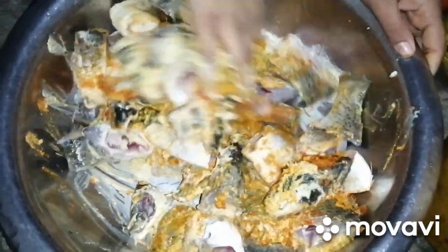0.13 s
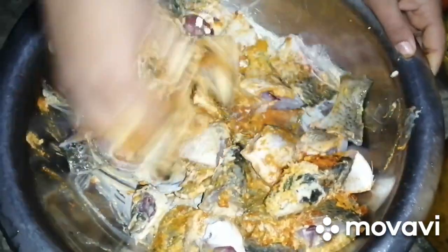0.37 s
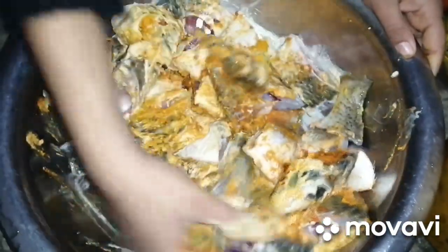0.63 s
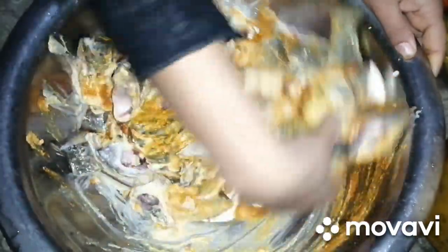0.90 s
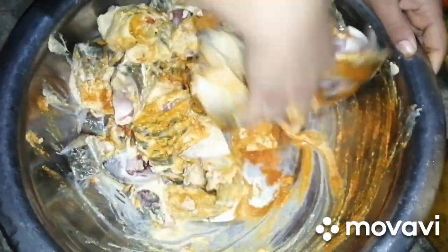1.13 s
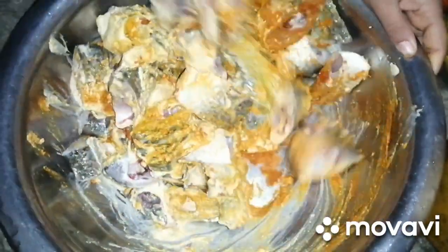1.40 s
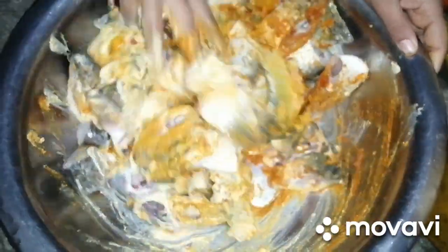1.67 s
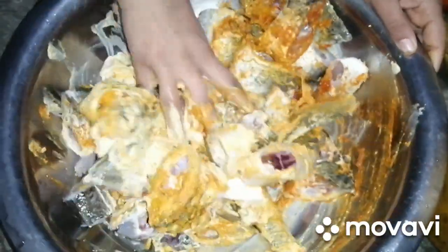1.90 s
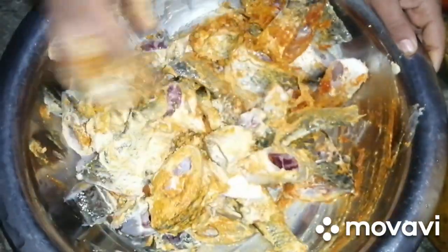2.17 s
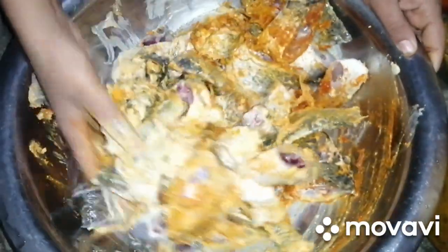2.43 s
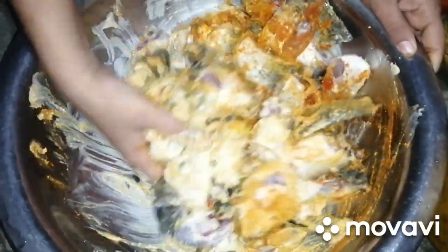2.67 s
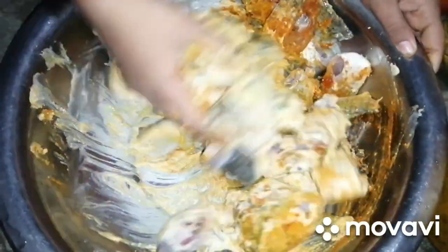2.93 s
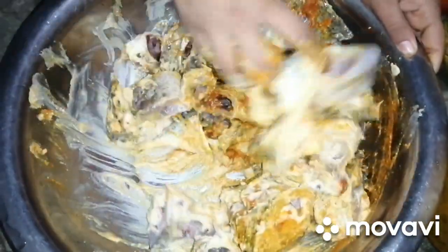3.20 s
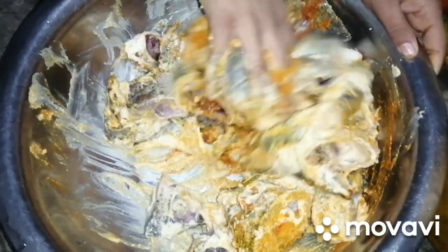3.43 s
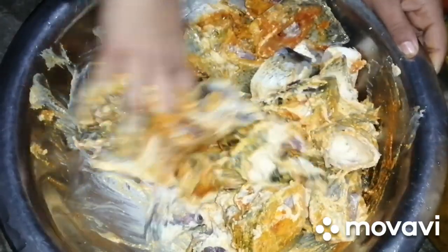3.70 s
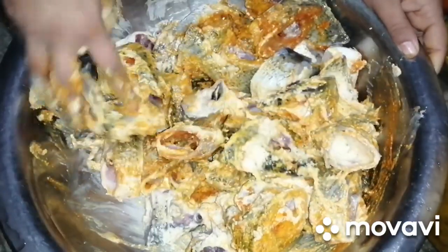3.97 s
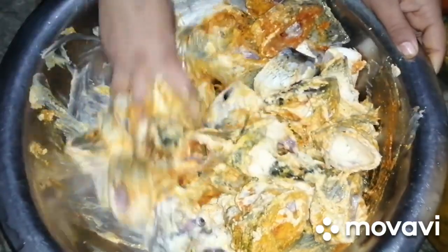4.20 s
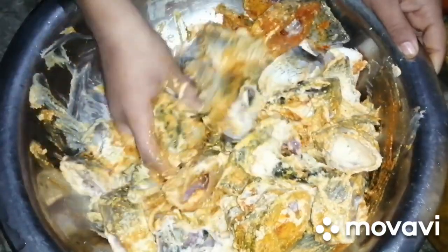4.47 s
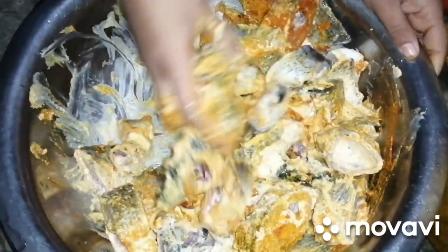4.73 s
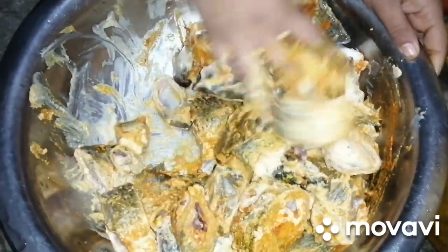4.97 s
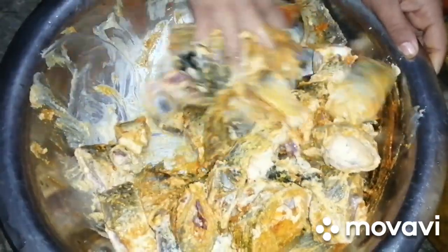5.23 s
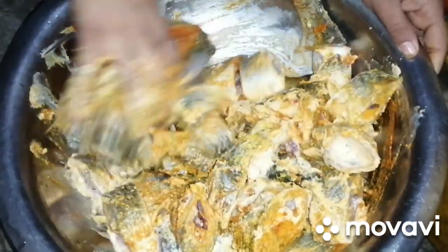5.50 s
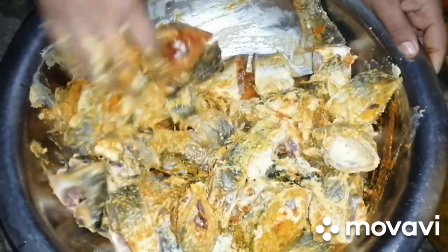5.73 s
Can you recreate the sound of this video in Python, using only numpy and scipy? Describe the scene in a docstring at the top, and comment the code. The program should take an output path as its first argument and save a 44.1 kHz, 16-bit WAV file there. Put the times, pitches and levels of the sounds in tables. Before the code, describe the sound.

Close slimy smacks and tearing paste in a wide metal bowl, occasional low bowl thumps, and a faint throbbing motor rising near the end.

```python
"""A hand turns pieces of raw fish through thick paste in a wide steel bowl in a bare kitchen.
From the start the paste hisses and crackles as noise that flares at random tears, and the bowl rocks and sloshes.
Faint tones soon glide, air pockets smack as short rings in rough cracks, and blows ring the bowl's modes,
hardest near the middle. The room answers with fading noise tails. A far motor, a pulsed low tone, grows
towards the end. Two microphone ports colour the treble very differently."""
import sys
import numpy as np
from scipy import signal
from scipy.fft import rfft, irfft, next_fast_len
from scipy.io import wavfile
from scipy.ndimage import uniform_filter1d, map_coordinates

SR = 44100
rng = np.random.default_rng(int(sys.argv[2]) if len(sys.argv) > 2 else 0)


def magnitude_from_level(level_db):
    """Linear magnitude for a level in decibels (20 dB per decade)."""
    exponent = np.asarray(level_db, float) / 20
    return 10 ** exponent


def generate_wav(signal):
    """Clip the signal to [-1, 1] and save it as 16-bit WAV at the path in sys.argv[1]."""
    frames = np.transpose(np.atleast_2d(signal))
    scaled = np.clip(frames, -1, 1) * 32767
    pcm = np.round(scaled).astype(np.int16)
    wavfile.write(sys.argv[1], SR, pcm)


N = 259043  # length in samples

# How alike long and short waves reach the two ports: f/Hz, left-right likeness (1 = the same)
LIKENESS = [(60, 0.81), (180, 0.95), (550, 0.48), (1650, 0), (4970, 0.0), (15000, 0.0)]
# Blows on the bowl: t/s, boom level/dB, body level/dB, knock level/dB, freedom to ring (0-1);
# the levels are relative, and thumps() trims each group
BLOWS = [(0.489, -55, -50.5, -44.5, 0.4), (0.809, -38.5, -55, -70, 0.36), (1.546, -41, -42, -31, 0.52),
         (1.751, -57, -44, -35, 1), (1.761, -28.5, -46, -23.5, 0.72), (1.806, -51, -58, -34, 0.67),
         (1.835, -44, -57, -36, 0.88), (2.117, -19.5, -49, -32, 0.53), (2.17, -30.5, -48, -39, 0.61),
         (2.29, -36.5, -55, -55, 0.6), (2.318, -41, -48, -37.5, 0.44), (2.831, -13, -19.5, -11.5, 0.51),
         (2.855, -21, -38, -28.5, 0.47), (3.352, -44.5, -49, -54.5, 1), (3.488, -68, -52, -54, 0.6),
         (4.8, -32.5, -56, -37.5, 0.5), (4.831, -47.5, -55, -41.5, 0.3), (5.19, -31.5, -20.5, -23, 0.81),
         (5.235, -42, -31.5, -61, 0.5), (5.733, -39, -44, -43, 0.28)]


def unit(x):
    """Scale to rms 1."""
    return x / np.sqrt(np.mean(x ** 2) + 1e-20)


def along(points, hz, order=1):
    """Read one column of a table on a log frequency axis."""
    table = np.transpose(points)
    return np.interp(np.log(hz + 1), np.log(table[0] + 1), table[order])


def curves(rows):
    """Give one value per sample for each column after the time."""
    s, *columns = np.transpose(rows)
    return [np.interp(np.arange(N) / SR, s, column) for column in columns]


def wobble(rate):
    """A smooth random curve through `rate` random points a second."""
    points = rng.standard_normal(int(N * 400 / SR) + 4)
    return map_coordinates(points, [np.arange(N) * rate / SR])


def filtered(x, response):
    """Multiply the spectrum of x by a response of frequency."""
    m = next_fast_len(N + SR // 2)
    return irfft(rfft(x, m) * response(np.fft.rfftfreq(m, 1 / SR)), m)[..., :N]


def hump(x, centre_hz, octaves):
    """Keep a bell-shaped band on a log axis, at rms 1."""
    return unit(filtered(x, lambda hz: np.exp(-(np.log2((hz + 1) / centre_hz) / octaves) ** 2)))


def rush(spectrum):
    """Stereo noise of rms 1: alike in the bass, where waves are long, and unrelated above."""
    def mid_side(hz):
        turn = np.arccos(np.clip(along(LIKENESS, hz), -1, 1)) / 2
        return magnitude_from_level(along(spectrum, hz)) * [np.cos(turn), np.sin(turn)]

    mid, side = filtered(rng.standard_normal((2, N)), mid_side)
    return unit(np.array([mid + side, mid - side]))


def patchy(x, depth_db):
    """Short narrow patches of random gain make the noise uneven in time and pitch."""
    z = signal.stft(x, nperseg=1024)[2]
    field = rng.standard_normal(z.shape[1:])
    for axis in (0, 1):
        field = uniform_filter1d(field, size=3, axis=axis)
    return signal.istft(z * magnitude_from_level(depth_db * unit(field)), nperseg=1024)[1][:, :N]


def room(x):
    """Each frequency of the kitchen's answer dies at its own speed; a new tail every third of a second."""
    # How long the room rings: f/Hz, time to fall 60 dB/s
    decay = [(100, 0.24), (600, 0.62), (1500, 0.44), (5000, 0.15), (12000, 0.033)]
    wet, hop = np.zeros((2, N + 2 * SR)), SR // 3
    for start in range(0, N, hop):
        hz, t, z = signal.stft(rng.standard_normal((2, SR * 3 // 4)), SR, nperseg=256)
        turn = np.arccos(np.clip(along(LIKENESS, hz), -1, 1))[:, None]
        z[1] = np.cos(turn) * z[0] + np.sin(turn) * z[1]  # long waves reach both ports alike
        fade = magnitude_from_level(-60 * t / along(decay, hz)[:, None])
        tail = signal.istft(z * fade, SR, nperseg=256)[1]
        echo = signal.fftconvolve(x[:, start:start + hop], tail / np.linalg.norm(tail[0]), axes=1)
        wet[:, start + 400:][:, :echo.shape[1]] += echo  # the answer comes 400 samples late
    return wet[:, :N]


def motor():
    """A far motor throbs through the floor: about 17 swells a second of a tone near 154 Hz."""
    # Slow rise and fall of the motor: t/s, level/dB
    swell = [(0, -65.5), (1, -64), (2, -88), (3, -61), (3.6, -71), (4.1, -68), (4.4, -55.5), (5, -52.5),
             (5.5, -50), (5.87, -51)]
    t = np.arange(N) / SR
    beat = (1 + np.cos(2 * np.pi * 17.1 * t + 1.2 * wobble(rate=2.5))) ** 1.2
    tone = np.sin(2 * np.pi * 154 * t + 0.58 * wobble(rate=5.2))
    level = magnitude_from_level(curves(swell)[0] + 0.4 * wobble(rate=15))
    return level * unit(beat * tone) * magnitude_from_level([[-1.4], [1.4]])  # leans right


def glides():
    """Soft wavering tones slide towards a resting pitch, quickly at first and then more slowly."""
    # Faint tones: start t/s, length/s, from f/Hz, to f/Hz, level/dB (rms, before the waver)
    slides = [(0.398, 0.48, 327, 312, -59.5), (0.777, 0.13, 1160, 1190, -66.5),
              (1.064, 0.198, 856, 955, -68.5)]
    out, t = np.zeros(N), np.arange(N) / SR
    for s, length, from_hz, to_hz, db in slides:
        progress = np.clip((t - s) / length, 0, 1)
        hz = to_hz + (from_hz - to_hz) * (1 - progress) ** 2 + 8 * wobble(rate=15)
        level = magnitude_from_level(db + 6.7 * wobble(rate=22)) * np.sin(np.pi * progress) ** 0.14
        out += level * np.sin(2 * np.pi * np.cumsum(hz) / SR)
    return out * np.sqrt(2)  # from rms to peak


def load():
    """The bowl rocks on its base and the pieces slosh against its wall, over a faint even hiss."""
    # Weight shifting in the bowl: t/s, rocking level/dB, sloshing level/dB
    shifting = [(0.0, -46, -50.5), (0.16, -57.5, -62.5), (0.45, -55, -64), (0.69, -59, -53.5),
                (1.1, -58, -60.5), (1.4, -54.5, -61), (1.9, -62.5, -61), (2.29, -45.5, -66),
                (2.37, -53.5, -50.5), (2.7, -57, -58), (3.1, -49, -64.5), (3.6, -58.5, -59),
                (3.86, -57.5, -65.5), (4.1, -53.5, -56), (4.46, -58.5, -56.5), (4.8, -53, -60.5),
                (5.3, -56, -56.5), (5.87, -50, -60.5)]
    # Colour of the rocking: f/Hz, relative level/dB per Hz
    rock_colour = [(15, -57), (25, -11.5), (43, -12.5), (113, -6), (150, -8), (167, -5.5), (193, -13),
                   (215, -12), (237, -20), (268, -12), (329, -16.5), (394, -17.5), (450, -34), (580, -68),
                   (990, -120)]
    # Colour of the sloshing: f/Hz, relative level/dB per Hz
    slosh_colour = [(210, -17), (350, -6.5), (436, 1), (462, -3), (550, 1.5), (641, 4), (1260, -4.5),
                    (2000, -13.5), (2600, -21), (4400, -120)]
    under_boom_db, fade_db_per_s = -23, 37.5  # a blow leaves the bowl rocking
    rock_db, slosh_db = curves(shifting)
    blow_s, boom_db = np.transpose(BLOWS)[:2, :, None]
    since = np.arange(N) / SR - blow_s
    after = (since > 0) * magnitude_from_level(boom_db + under_boom_db - fade_db_per_s * abs(since))
    rock_level = np.sqrt(magnitude_from_level(rock_db) ** 2 + (after ** 2).sum(0))
    rock = rock_level * magnitude_from_level(0.54 * wobble(rate=4.1)) * rush(rock_colour)
    hiss = magnitude_from_level(-76.5) * hump(rng.standard_normal((2, N)), 2300, 0.98)
    slosh = magnitude_from_level(slosh_db + 2.55 * wobble(rate=24)) * unit(patchy(rush(slosh_colour), depth_db=4.5))
    return rock + hiss + slosh


def thumps():
    """Blows ring three groups of bowl modes, which paste on the wall shortens; gives direct and room sound."""
    # Ways the paste-damped bowl rings: f/Hz, relative level/dB, time to fall 60 dB/s at freedom 1
    modes = [(54.5, -4, 0.32), (103.1, -4, 0.92), (160, 1, 0.4), (186.2, 3, 0.36), (210.7, 9, 0.16),
             (255.6, -0.5, 0.2), (353.4, -12.5, 0.19), (416.5, -14, 0.16), (471.6, -6.5, 0.046),
             (568.2, 9, 0.033), (647, -6, 0.077), (709, -12, 0.054), (838, -25.5, 0.29),
             (980, -15.5, 0.072), (1200, -17, 0.04)]
    # Edges between boom, body and knock: f/Hz
    group_edges = [235, 320]
    echo_db, echo_loss_db = 13, 38.5  # a damped blow passes more into counter and room; loss at freedom 1
    out, t = np.zeros((2, 2, N + SR)), np.arange(SR // 2) / SR
    hz, level_db, t60 = np.transpose(modes)[:, :, None]
    group = np.searchsorted(group_edges, hz)
    lean_db = np.array([-1.8, -1.2, .8])[group]  # boom and body lean right, knock leans left
    chance_db = rng.standard_normal((len(BLOWS), len(modes), 1))
    onset = (1 - np.exp(-t / 0.0012)) ** 2
    for (s, *force_db, free), extra_db in zip(BLOWS, chance_db):
        size_db = level_db + np.add(force_db, [-6, 5, 5])[group] + extra_db
        rings = magnitude_from_level(size_db - 60 * t / (t60 * free)) * np.sin(2 * np.pi * hz * t)
        left, right = (magnitude_from_level(lean_db) * rings).sum(0), (magnitude_from_level(-lean_db) * rings).sum(0)
        pair = np.array([left, right]) * onset
        start = round((s + 0.002) * SR)  # the flesh squashes before the steel moves
        out[..., start:][..., :len(t)] += [pair, magnitude_from_level(echo_db - echo_loss_db * free) * pair]
    return filtered(out[..., :N], lambda f: (1j * f / (1j * f + 90)) ** 2)  # a small bowl radiates no deep bass


def strokes(rows, rise_db_per_s):
    """Sum the power of rise-sag-release shapes, one curve for each level column."""
    sag_db_per_s, release_db_per_s = 26.5, 228  # while the stroke holds, and after it
    start, hold, *level_db = np.transpose(rows)[:, :, None]
    coarse_steps = np.arange(0, N, 32)
    t = coarse_steps / SR - start
    shape_db = rise_db_per_s * np.minimum(t, 0) - sag_db_per_s * np.clip(t, 0, hold)
    shape_db = shape_db - release_db_per_s * np.maximum(t - hold, 0)
    power = [(magnitude_from_level(shape_db + db) ** 2).sum(0) for db in level_db]
    return np.array([np.interp(np.arange(N), coarse_steps, p) for p in power])


def tearing():
    """Gain of small, medium, finest and coarse tearing, from the summed power of all strokes."""
    # The hand grabs and the paste tears at once; levels before the trims in paste():
    # start t/s, hold/s, small level/dB, medium level/dB, finest level/dB
    grabs = [(0.0, 0.17, -53, -63, -61.5), (.466, 0.11, -51.5, -91, -66), (1.408, 0.033, -57, -76, -65),
             (1.589, 0.11, -56.5, -55, -60.5), (1.724, 0.12, -51, -52.5, -63.5),
             (2.322, 0.083, -54.5, -58.5, -62), (2.836, 0.043, -54, -49, -64), (3.964, 0.16, -54, -64, -76),
             (4.33, 0.068, -47, -45, -56.5), (5.182, 0.24, -53.5, -84, -61.5)]
    # The hand sweeps through and the tearing swells; levels before the same trims:
    # fullest from t/s, hold/s, small level/dB, medium level/dB, finest level/dB
    sweeps = [(.68, 0.49, -51, -49.5, -57.5), (.96, 0.089, -47, -50.5, -57), (1.36, .04, -60, -83, -61.5),
              (2.14, 0.024, -59, -61, -61.5), (2.25, 0.039, -77, -72.5, -92),
              (2.41, 0.052, -51, -53, -56.5), (2.58, .09, -58, -59, -67), (2.74, 0.075, -60, -60.5, -58.5),
              (3.4, .15, -60.5, -65.5, -64), (3.65, .1, -53.5, -57.5, -60), (4.14, 0.13, -54.5, -58.5, -58),
              (4.5, 0.092, -48, -57, -57.5), (4.85, 0.52, -65, -62.5, -69.5),
              (5.45, 0.1, -52.5, -47.5, -54.5), (5.53, 0.064, -44.5, -49, -64),
              (5.66, 0.14, -51.5, -55, -67)]
    # Big pockets of paste squelch open; level before the same trims: fullest from t/s, hold/s, level/dB
    squelches = [(.7, 0.0089, -51.5), (1.41, 0.014, -68), (1.75, 0.026, -53.5), (1.86, 0.0067, -53),
                 (2.42, 0.019, -55), (4.21, 0.026, -58.5), (5.2, 0.025, -53.5), (5.56, 0.027, -62),
                 (5.73, 0.013, -56.5)]
    creep_db = np.array([-70.5, -74, -74.5])  # paste settling between strokes
    power = strokes(grabs, rise_db_per_s=4000) + strokes(sweeps, rise_db_per_s=104)
    power = power + magnitude_from_level(creep_db)[:, None] ** 2
    under_medium = magnitude_from_level(-11.5) ** 2 * power[1]
    coarse = under_medium + strokes(squelches, rise_db_per_s=250)[0]
    return np.sqrt([*power, coarse])


def ticks(small_pocket_hz):
    """Threads snap at random as small pockets, louder where the small tearing is louder."""
    place, e = rng.random(60), rng.standard_normal((60, 4))
    tearing_db = 20 * np.log10(tearing()[0][(place * N).astype(int)])
    db = tearing_db + 11 - e[:, 0]
    hz = small_pocket_hz * np.exp(0.072 * e[:, 1])
    pan_db, crack_db = 5 * e[:, 2], -2.5 + 4 * e[:, 3]
    return np.transpose([place * N / SR, db, hz, pan_db, crack_db])


def smacks():
    """A pocket bursts: a short ring at its pitch inside a rough crack that is strongest around that pitch."""
    # Air pockets that burst loudly: t/s, level/dB, pitch f/Hz, left over right/dB, crack level/dB;
    # both levels are relative and trimmed below
    loud_bursts = [(0.4657, -26, 5370, -11, -25), (0.5288, -22, 4900, 2, -36), (0.7352, -29.5, 1090, 2, -2),
                   (0.8614, -32.5, 5300, -8, -2.5), (0.8684, -33.5, 1200, 7, -7),
                   (0.9248, -30, 3570, -17, -33), (1.3884, -33, 4670, 2, -30), (1.4037, -21, 3200, 3.5, 0),
                   (1.4065, -23.5, 1980, -6, -16.5), (1.5484, -19, 1230, -0.5, -21),
                   (1.5883, -31, 2160, 4, -4), (1.6772, -29, 6130, 16, -3), (1.722, -28.5, 5010, 3, -4),
                   (2.434, -30, 5940, 0, 5), (2.4937, -21.5, 1010, 3, -21), (2.606, -38.5, 5300, 2, 2.5),
                   (2.7357, -30.5, 3020, -5, -17), (2.8234, -25.5, 875, -3, -30), (2.832, -30, 5480, 6, 5),
                   (3.1948, -43.5, 5440, 3, 0), (3.3428, -40, 1400, 7, -10), (3.41, -34.5, 5400, 3, 0.5),
                   (3.4545, -34, 5400, -2, -24), (3.467, -33, 6100, -8, -6), (3.4863, -34.5, 5320, 7, 1),
                   (3.569, -33, 3450, 12, -2.5), (3.8081, -28.5, 5080, -5.5, -13),
                   (3.9625, -32, 5420, 4, -4), (4.2375, -29, 5130, 5, -8.5), (4.3299, -39, 3190, 12, 3),
                   (4.5565, -27.5, 1390, -5, -11), (4.6773, -34, 1290, 4, -10),
                   (4.6965, -35, 4930, -4, -10), (4.875, -33.5, 1410, -2, -15), (5.0285, -34, 1040, 4, -27),
                   (5.1086, -46, 5340, 3, 7), (5.1792, -29, 1370, 7, -5), (5.191, -30, 4940, -0.5, 3.5),
                   (5.2335, -28, 880, 1, -14), (5.3834, -26, 5560, 1, -41)]
    pocket_hz, pocket_t60_s, size_law = 5370, 0.0063, 0.66  # a small pocket; deeper ones ring longer
    out, t = np.zeros((2, N + SR)), np.arange(SR // 12) / SR
    bursts = [*loud_bursts, *ticks(pocket_hz)]
    chance = rng.standard_normal((len(bursts), 2, len(t)))
    for (s, db, hz, pan_db, crack_db), noise in zip(bursts, chance):
        fade_db = -60 * t / (pocket_t60_s * (pocket_hz / hz) ** size_law)
        phase = noise[:, :1]  # random on each side
        ring = magnitude_from_level(fade_db) * np.sin(2 * np.pi * hz * t + phase) * (1 - np.exp(-t / 0.00055))
        around_pitch = uniform_filter1d(noise, size=6) * np.cos(2 * np.pi * hz * t)
        crack = magnitude_from_level(crack_db - 3.0 + 0.28 * fade_db) * (0.37 * noise + 2.26 * around_pitch)
        sides = magnitude_from_level([[pan_db / 2], [-pan_db / 2]])
        out[:, round(s * SR):][:, :len(t)] += magnitude_from_level(db - 4) * (ring + crack) * sides
    return filtered(out[:, :N], lambda hz: 1 / (1 + (800 / (hz + 1)) ** 4))  # little below 800 Hz


def crackle(per_s, spread_db, life_s, bed):
    """Noise flares at random tears of uneven size over a patchy bed; each port hears its own fine detail."""
    when, size = rng.random((2, N))
    tears = (when < per_s / SR) * magnitude_from_level(-spread_db * np.log(size + 5e-3))
    flare = signal.lfilter([1], [1, -np.exp(-1 / (life_s * SR))], tears)
    return (bed + unit(flare)) * unit(patchy(rng.standard_normal((2, N)), depth_db=3.5))


def paste():
    """Paste tears off flesh and steel: crackle of four sizes follows the stroke and flutters together."""
    small, medium, fine, coarse = tearing()
    flutter_db = 1.2 * wobble(rate=45)
    small = magnitude_from_level(-2.0) * small * hump(crackle(330, 6.7, 0.0077, bed=1.34), 5800, 0.55)
    medium = magnitude_from_level(-7) * medium * hump(crackle(220, 2.9, 0.0015, bed=4.6), 2895, 0.39)
    coarse = magnitude_from_level(1.2) * coarse * hump(crackle(120, 4, .003, bed=1.8), 1700, .45)
    finest = hump(crackle(400, 7.2, 0.0013, bed=1.0), 10440, 0.49)
    finest = finest + 0.51 * hump(crackle(400, 10.0, .0011, bed=0.85), 14560, 0.2)
    return magnitude_from_level(flutter_db) * (small + medium + coarse + magnitude_from_level(8.0) * fine * finest)


def scene():
    """Add the near sources, the room's answer to blows and smacks, and the background."""
    (blows, sent), pops = thumps(), smacks()
    echo = room(sent + magnitude_from_level(-12.0) * pops)
    return blows + pops + echo + paste() + load() + motor() + glides()


def low_pass(x):
    """Removes everything above the highest recorded frequency."""
    return signal.sosfilt(signal.butter(12, 16510, fs=SR, output="sos"), x)


def record(dry):
    """Each microphone port has its own treble resonances, under a sharp band limit."""
    # Colour of the two ports: f/Hz, left level/dB, right level/dB
    port_colour = [(102, -2, -1), (513, 0, 0), (1530, 1, 1.5), (1900, 3, 3), (2690, 7.5, 11.5),
                   (3330, -0.5, 13), (3700, 2.5, 6), (4340, -0.5, 10), (5400, 3, 16), (6200, -2, 11),
                   (6800, 1, 5.5), (9830, 0.5, -12.5), (11000, -6.5, -10), (14900, -7.5, -3.5)]
    top_hz = 15900

    def response(hz):
        left_db, right_db = along(port_colour, hz, order=1), along(port_colour, hz, order=2)
        return magnitude_from_level([left_db, right_db]) * (hz < top_hz)

    mix = filtered(dry, response)
    return low_pass(mix)


dry = scene()
out = record(dry)
generate_wav(out)
```